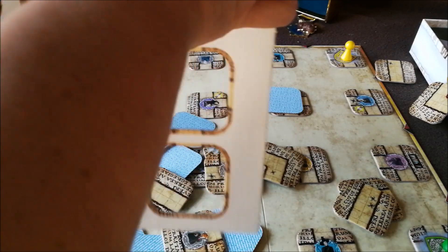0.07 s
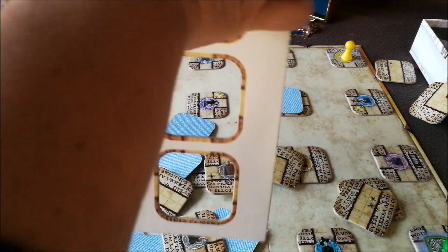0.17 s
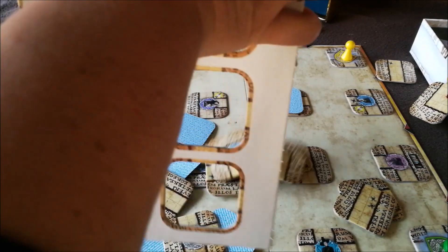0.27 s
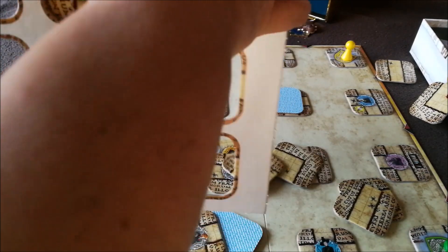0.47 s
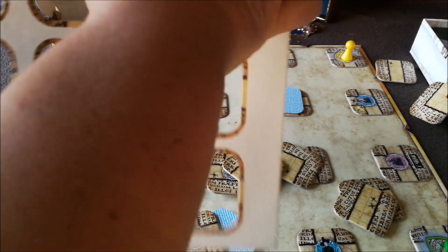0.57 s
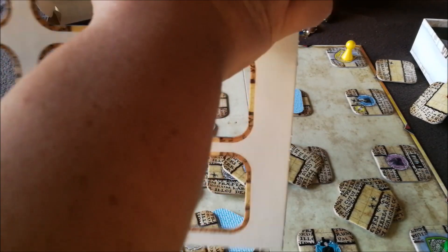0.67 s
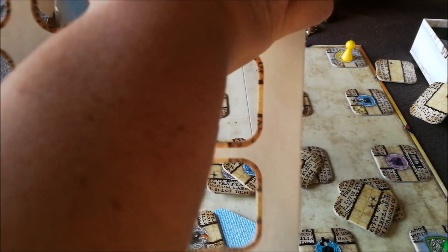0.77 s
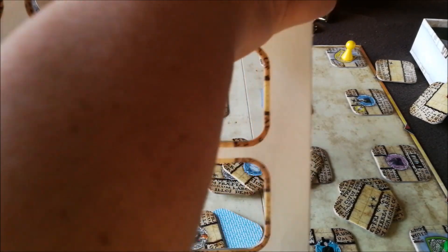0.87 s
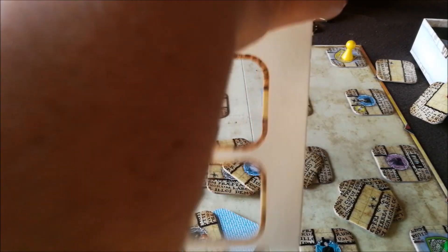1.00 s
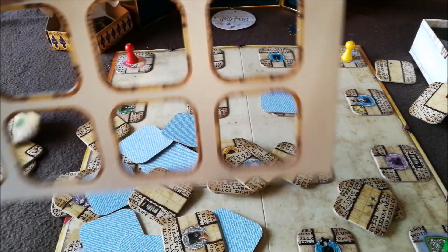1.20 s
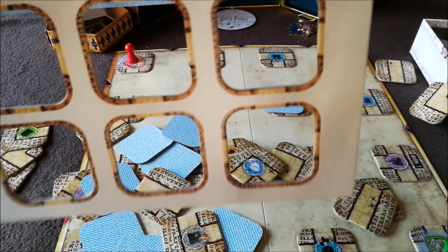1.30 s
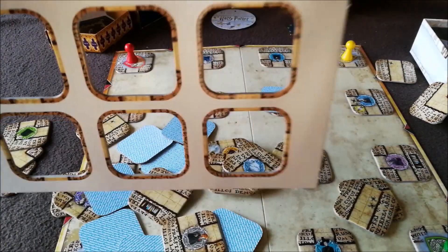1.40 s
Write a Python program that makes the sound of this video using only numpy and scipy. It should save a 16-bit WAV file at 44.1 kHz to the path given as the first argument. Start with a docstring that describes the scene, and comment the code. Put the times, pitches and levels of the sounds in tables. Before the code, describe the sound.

Close by in a small quiet room, a cardboard sheet pops and its tiles snap free, loudest near the start. The loose pieces tap and scrape onto a pile, then the sheet gives a few light ticks.

```python
"""Cardboard tiles patter onto a pile as more are thumbed out of a punched sheet above a game board.
The sheet buckles with a pitched pop, its paper bridges fracture in sharp snaps, and the freed tiles
ring, knock and scrape. At the end the emptied sheet slides through the fingers and ticks three times.
Impacts are decaying noise bursts and damped modes, friction is grainy noise; a small quiet room
adds a short reverberation."""
import sys
import numpy as np
from scipy import signal
from scipy.fft import rfft, irfft
from scipy.io import wavfile
from scipy.ndimage import uniform_filter1d

SR = 44100
rng = np.random.default_rng(int(sys.argv[2]) if len(sys.argv) > 2 else 0)


def to_wav(s):
    """Save 16-bit WAV."""
    ch = np.atleast_2d(s).T  # columns
    pcm = np.round(np.clip(ch, -1, 1) * 32767)  # PCM
    wavfile.write(sys.argv[1], SR, pcm.astype(np.int16))


N = 63945
BURST_SAMPLES = 4096
HZ = np.fft.rfftfreq(BURST_SAMPLES, 1 / SR)
CARD_LAG_RAD, FRAME_LAG_RAD = .2, 1.6  # phase lag of a high mode at the right microphone


def amp(db):
    """Amplitude ratio: a factor of ten for every 20 dB."""
    return 10 ** (np.asarray(db) / 20)


def curve(points, hz):
    """Linear interpolation on a logarithmic frequency axis."""
    f, value = np.transpose(points)
    return np.interp(np.log(hz + 1e-6), np.log(f), value)


def bell(centre_hz, width_oct):
    """A spectral peak of height 1, Gaussian in log frequency."""
    return np.exp(-.5 * (np.log2((HZ + 1) / centre_hz) / width_oct) ** 2)


def add(mix, s, sound):
    """Superposition: a stereo sound joins the mix at s seconds."""
    part = mix[:, max(round(s * SR), 0):][:, :sound.shape[1]]
    part += sound[:, :part.shape[1]]


def at_level(x, db):
    """Equal energy: each channel gets the energy of 5 ms at this level."""
    energy = (x ** 2).sum(1, keepdims=True) + 1e-20
    return x * amp(db) * np.sqrt(.005 * SR / energy)


def coloured(x, colour_db):
    """Minimum-phase filter: the phase follows from the log gain by the Hilbert transform."""
    log_gain = np.log(amp(np.maximum(colour_db, -100)))
    mirrored = np.concatenate([log_gain, log_gain[..., -2:0:-1]], -1)
    impulse = np.fft.ifft(np.exp(np.conj(signal.hilbert(mirrored)))).real
    return signal.fftconvolve(x, np.atleast_2d(impulse), axes=1)[:, :x.shape[1]]


def whitening_db(x, bins):
    """Whitening: the gain that evens out chance peaks in a noise spectrum."""
    power = (abs(rfft(x)) ** 2).mean(0)
    uneven_db = 10 * np.log10(uniform_filter1d(power, size=bins) + 1e-12)
    return uneven_db.mean() - uneven_db


# Left-right coherence near the sheet: f/Hz, coherence/1
NEAR_COHERENCE = [(150, .98), (600, .88), (2000, .5), (8000, .3)]
def stereo_noise(count, envelope=1, coherence=NEAR_COHERENCE):
    """Partial coherence: white noise at two microphones is more alike at long wavelengths."""
    a, b = rfft(envelope * rng.standard_normal((2, count)))
    alike = np.clip(curve(coherence, np.fft.rfftfreq(count, 1 / SR)), -1, 1)
    mid, side = np.sqrt((1 + alike) / 2) * a, np.sqrt((1 - alike) / 2) * b
    return irfft(np.array([mid + side, mid - side]), count)


def steady(spectrum, db):
    """Stationary noise, spectrally shaped, at an RMS level."""
    gain = amp(curve(spectrum, np.fft.rfftfreq(N, 1 / SR)))
    x = irfft(rfft(stereo_noise(N)) * gain, N)
    return amp(db) * x / x.std()


def burst(colour_db, decay_s, db, attack_s=.00015, grain_db=3.5):
    """Source and filter: a grainy, exponentially dying noise burst is given a spectral colour."""
    t = np.arange(BURST_SAMPLES) / SR
    grains = amp(grain_db * np.repeat(rng.standard_normal(BURST_SAMPLES // 8), 8))
    envelope = grains * (1 - np.exp(-t / attack_s)) * np.exp(-t / decay_s)
    x = stereo_noise(BURST_SAMPLES, envelope) * (1 - t / t[-1])
    return at_level(coloured(x, colour_db + whitening_db(x, bins=20)), db)


def ring(modes, db, lag_rad=CARD_LAG_RAD, full_lag_hz=2500, attack_s=.0007):
    """Free vibration: a sum of damped modes, the higher ones lagging more on the right."""
    t = np.arange(SR // 4) / SR
    x = 0
    for hz, mode_db, t60 in modes:
        behind = lag_rad * min(hz / full_lag_hz, 1) * np.array([[0], [1]])
        x = x + amp(mode_db - 60 * t / t60) * np.sin(2 * np.pi * hz * t - behind)
    onset = 1 - np.exp(-(t / attack_s) ** 2)
    return at_level(x * onset, db)


def from_left(x, delay_s=.00007):
    """Path difference: sound from the left reaches the right microphone later."""
    return np.array([x[0], np.pad(x[1], (round(delay_s * SR), 0))[:N]])


# Spectrum of the room's air: f/Hz, level/dB
AIR_SPECTRUM = [(20, 1.5), (70, 8), (150, -7), (400, -0.5), (1000, -5), (3000, -10.5), (10000, -18.5),
                (16000, -23)]
def room_air():
    """Ambient noise: a faint, steady hush, strongest in the bass."""
    return steady(AIR_SPECTRUM, db=-69.5)


# Left-right coherence of the diffuse field: f/Hz, coherence/1
TAIL_COHERENCE = [(150, .92), (500, .6), (1200, .3), (3000, 0)]
# Reverberation time: f/Hz, T60/s
TAIL_T60 = [(100, 0.44), (600, 0.23), (2000, 0.29), (6000, 0.25), (14000, 0.26)]
# Reverberation relative to the sound that excites it: f/Hz, level/dB
TAIL_SPECTRUM = [(100, -5), (600, -4), (2000, -4.5), (6000, -6.5), (14000, -5)]
# Early reflections from nearby things: t/s, level/dB
REFLECTIONS = [(.0075, -31.5), (0.0088, -16.5)]
def room(x, delay_s=.0045, build_s=.003):
    """Reverberation: early reflections and a diffuse tail that decays exponentially in each band."""
    count = 6 * BURST_SAMPLES
    hz, t, bands = signal.stft(stereo_noise(count, coherence=TAIL_COHERENCE), SR, nperseg=256)
    decay = amp(-60 * t / curve(TAIL_T60, hz)[:, None])
    tail = signal.istft(bands * decay, SR, nperseg=256)[1][:, :count]
    tail = tail * np.clip((np.arange(count) / SR - delay_s) / build_s, 0, 1)
    tail = coloured(tail, whitening_db(tail, bins=40))
    tail = coloured(tail / np.linalg.norm(tail[0]), curve(TAIL_SPECTRUM, HZ))
    out = signal.fftconvolve(x, tail, axes=1)[:, :N]
    for s, db in REFLECTIONS:
        add(out, s, amp(db) * x[::-1])  # left and right swap
    return out


# Strokes of card sliding on skin and dragging on card: t/s, duration/s, level/dB
SKIN_STROKES = [(1.17, .1, -55.5)]
CARD_STROKES = [(0, 0.061, -44), (.189, 0.027, -34.5), (.49, 0.045, -57), (.645, 0.068, -46),
                (.89, 0.0079, -54), (.904, .0089, -43.5), (1.3, 0.089, -42)]
# Their spectra: f/Hz, level/dB
SKIN_SPECTRUM = [(100, -54.5), (3800, -0.5), (5200, 9.5), (9000, 4), (12000, -9), (16000, -17.5)]
CARD_SPECTRUM = [(30, -22.5), (250, -7), (600, -22), (1200, 11), (1800, -2.5), (2600, 4), (9000, -2.5),
                 (16000, -19.5)]
def friction(strokes, spectrum, grain_db):
    """Sliding friction: noise swells and fades with each stroke, roughened by fibres catching."""
    t = np.arange(N) / SR
    swell = sum(amp(db) * np.sin(np.pi * np.clip((t - s) / length, 0, 1)) ** 2
                for s, length, db in strokes)
    catch = uniform_filter1d(rng.standard_normal(N), size=50)
    grains = amp(grain_db * catch / catch.std())
    return steady(spectrum, 0) * swell * grains / np.sqrt(np.mean(grains ** 2))


# A low click as the sound starts abruptly, then soft low thumps of the handled sheet: t/s, level/dB
LOW_TRANSIENTS = [(.0005, -47.5), (0.202, -39), (.237, -51), (.323, -49), (0.465, -54), (0.594, -59),
                  (0.911, -44), (1.186, -65), (1.32, -54), (1.39, -50.5)]
# Their spectrum: f/Hz, level/dB
LOW_SPECTRUM = [(25, -16.5), (85, 0.5), (170, -0.5), (250, -13.5), (450, -7.5), (2000, -22)]
def low_transients(decay_s=.0098):
    """Damped bass bursts: a low click opens the sound, then the handled sheet thumps softly."""
    out = np.zeros((2, N))
    for s, db in LOW_TRANSIENTS:
        add(out, s, burst(curve(LOW_SPECTRUM, HZ), decay_s, db))
    return out


# Spectrum of card scraping, clicking or crackling: f/Hz, level/dB
SCRAPE_SPECTRUM = [(100, -35), (900, -9), (2000, -5.5), (4400, 0.5), (5600, -1.5), (8500, 0), (10000, -5),
                   (12000, -13.5), (16000, -27)]
def scrape(decay_s, db, emphasis_db=0):
    """Broadband transient: the card's fibres give way in a burst that reaches far into the treble."""
    return burst(curve(SCRAPE_SPECTRUM, HZ) + emphasis_db, decay_s, db)


# Ticks of the sheet's frame: t/s, ring level/dB, click level/dB
FRAME_TICKS = [(.1175, -46.5, -51.5), (1.2782, -37.5, -42.5), (1.3074, -31.5, -35), (1.327, -36, -35)]
# Its modes: f/Hz, level/dB, T60/s
FRAME_RESONANCES = [(2250, -5, .012), (2500, -5, .03), (2600, 0, .04), (6100, -5, .009)]
def frame_ticks():
    """Impulse response: the stiff frame clicks and rings in high, strongly damped modes."""
    out = np.zeros((2, N))
    for s, ring_db, click_db in FRAME_TICKS:
        add(out, s, ring(FRAME_RESONANCES, ring_db, FRAME_LAG_RAD))
        add(out, s, scrape(decay_s=.00079, db=click_db))
    return out


BUCKLE_S = .2021
# Modes of the sheet's pop: f/Hz, level/dB, T60/s
POP_RESONANCES = [(1200, -4, .018), (1320, 0, .018), (1700, -10, .01), (3850, -11, .009)]
def sheet_buckle():
    """Buckling: the sheet gives way under the thumb with a pitched pop and a crackle."""
    out = np.zeros((2, N))
    add(out, BUCKLE_S, ring(POP_RESONANCES, db=-28))
    add(out, BUCKLE_S, scrape(decay_s=.00082, db=-31.5))
    return out


# Tiles set ringing, one as it comes free and two as they land: t/s, level/dB
TILE_RINGS = [(.3305, -22), (.4675, -33), (.5007, -32)]
# Modes of a tile and of the buckled sheet: f/Hz, level/dB, T60/s
TILE_RESONANCES = [(515, -8, .22), (615, -6, .25), (824, -1, .22), (2460, 13, .045), (2510, 2, .2),
                   (4857, -4, .22), (5973, -4, .24), (7432, -7, .24)]
SHEET_RESONANCES = [(1110, -4, .17), (1217, 0, .15), (1308, -5, .11)]
def lingering_tones():
    """Modal decay: tones of the freed tiles and the buckled sheet hang in the room."""
    out = np.zeros((2, N))
    for s, db in TILE_RINGS:
        add(out, s, ring(TILE_RESONANCES, db))
    add(out, BUCKLE_S, ring(SHEET_RESONANCES, db=-31.5))
    return out


# Tiles landing and jostling: t/s, knock level/dB, knock f/Hz, scrape level/dB, scrape f/Hz, its decay/s
LANDINGS = [(.0003, -34, 643, -35, 6860, 0.0032), (.007, -39, 730, -36.5, 6000, .009),
            (0.0221, -37, 704, -66, 3000, 0.0027), (.025, -37.5, 625, -40, 3800, 0.0016),
            (.064, -38, 620, -47, 6150, 0.0027), (.1170, -39.5, 653, -50, 6200, 0.0032),
            (0.1609, -44, 630, -62, 5000, 0.0013), (.352, -33.5, 1120, -61, 3000, .0015),
            (0.386, -38.5, 638, -52, 3000, 0.0019), (0.4636, -33, 770, -38, 8560, 0.0019),
            (0.4678, -31.5, 745, -31.5, 9200, .0013), (.487, -36, 610, -32, 5600, 0.006),
            (0.5003, -29.5, 691, -29, 7260, 0.0018), (0.5075, -33, 648, -32, 9000, 0.0016),
            (.5115, -31.5, 663, -33, 8500, 0.00088), (0.5418, -39, 624, -34.5, 4900, 0.0018),
            (.546, -40.5, 643, -37.5, 8700, 0.00073), (0.6004, -60, 630, -44.5, 8100, 0.004),
            (0.6039, -68, 710, -39.5, 9350, 0.0013), (.615, -58.5, 650, -48.5, 8900, 0.0013),
            (0.996, -36.5, 750, -44, 4460, 0.0016), (1.0048, -39, 720, -32.5, 4740, 0.009),
            (1.031, -37, 840, -38, 4500, 0.0033), (1.0359, -34, 935, -27.5, 5000, 0.0045),
            (1.0742, -37.5, 895, -39, 4080, .0023)]
# Spectrum of a knock: f/(knock f), level/dB
KNOCK_SPECTRUM = [(.06, -38.5), (.22, -18.5), (.36, -7), (.5, -13.5), (.85, 3.5), (1.15, -0.5), (1.6, -4.5),
                  (2.7, -13.5), (3.7, -10.5), (5.3, -15.5), (14, -44)]
def tile_landings(knock_decay_s=.0036):
    """Impact with friction: a falling tile knocks on the pile while its edge scrapes."""
    out = np.zeros((2, N))
    for s, knock_db, knock_hz, scrape_db, scrape_hz, decay_s in LANDINGS:
        add(out, s, burst(curve(KNOCK_SPECTRUM, HZ / knock_hz), knock_decay_s, knock_db))
        add(out, s, scrape(decay_s, scrape_db, emphasis_db=6 * bell(scrape_hz, width_oct=.085)))
    return out


# Bridges breaking: t/s, crack level/dB, crack f/Hz, crack decay/s, dip or peak above crack f/dB,
# thock level/dB, thock f/Hz, ring level/dB, ring f/Hz, left minus right/dB, level into the room/dB
FRACTURES = [(.3200, -18.5, 6800, 0.0025, -14, -23, 590, -25.5, 875, 0.5, -4),
             (0.33, -12, 5540, 0.0053, 4.5, -45, 580, -38, 520, 0.5, -1.5),
             (.3360, -18, 8230, 0.002, -4, -32.5, 596, -25.5, 4830, -5.5, -2.5),
             (0.6686, -25.5, 4540, 0.0048, 4, -31, 967, -49.5, 924, 0.5, 0),
             (.9097, -17, 3660, 0.0027, -15, -20, 581, -33, 4390, -0.5, 0.5),
             (.9200, -28.5, 9500, 0.0034, 4.5, -41, 620, -28.5, 4640, 2.5, 3)]
# Spectrum of a crack: f/Hz, level/dB
CRACK_SPECTRUM = [(100, -47.5), (700, -16.5), (1700, -12), (2500, 0.5), (3200, -4), (4600, 1), (5300, -2.5),
                  (7000, -2.5), (9500, 0.5), (12000, -13.5), (16000, -26.5)]
# Spectrum of a thock: f/(thock f), level/dB
THOCK_SPECTRUM = [(.06, -22.5), (.2, -20.5), (.38, -4.5), (.55, -10), (.85, 0), (1.17, 7.5), (1.55, -8.5),
                  (2.4, -4.5), (4, -20.5), (14, -36)]
def bridge_snaps(thock_decay_s=.0032, ring_t60_s=.019):
    """Fracture: a bridge cracks, the released sheet gives a hollow thock and the tile rings briefly."""
    direct, to_room = np.zeros((2, 2, N))
    for (s, crack_db, crack_hz, decay_s, upper_db,
         thock_db, thock_hz, ring_db, ring_hz, pan_db, room_db) in FRACTURES:
        emphasis_db = 5.5 * bell(crack_hz, width_oct=.4)
        emphasis_db += upper_db * bell(1.39 * crack_hz, width_oct=.092)
        crack = burst(curve(CRACK_SPECTRUM, HZ) + emphasis_db, decay_s, crack_db)
        thock = burst(curve(THOCK_SPECTRUM, HZ / thock_hz), thock_decay_s, thock_db)
        tone = ring([(ring_hz, 0, ring_t60_s)], ring_db)[:, :BURST_SAMPLES]
        snap = (crack + thock + tone) * amp([[pan_db / 2], [-pan_db / 2]])
        add(direct, s, snap)
        add(to_room, s, amp(room_db) * snap)
    return direct, to_room


def scene():
    """Superposition: direct sound from slightly left, its reverberation and the room's air."""
    handling = tile_landings() + sheet_buckle() + low_transients() + frame_ticks()
    handling += friction(SKIN_STROKES, SKIN_SPECTRUM, grain_db=1.5)
    handling += friction(CARD_STROKES, CARD_SPECTRUM, grain_db=3)
    snaps, snaps_to_room = bridge_snaps()
    direct = from_left(snaps + handling + lingering_tones())
    return direct + room(from_left(snaps_to_room + handling)) + room_air()


def record(dry):
    """Soft saturation rounds the highest peaks; a low-pass filter limits the band."""
    ceiling, cutoff_hz = .9, 16300
    rounded = dry / (1 + (dry / ceiling) ** 8) ** (1 / 8)
    low_pass = signal.firwin(255, cutoff_hz, window=("kaiser", 9), fs=SR)
    return signal.oaconvolve(rounded, low_pass[None], "same")


dry = scene()
out = record(dry)
to_wav(out)
```